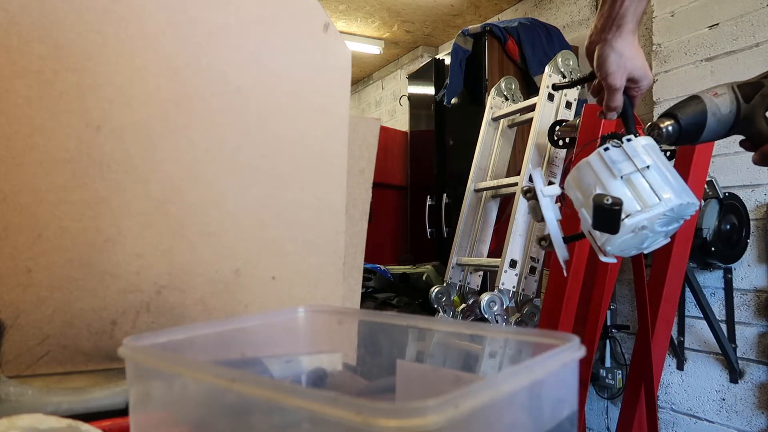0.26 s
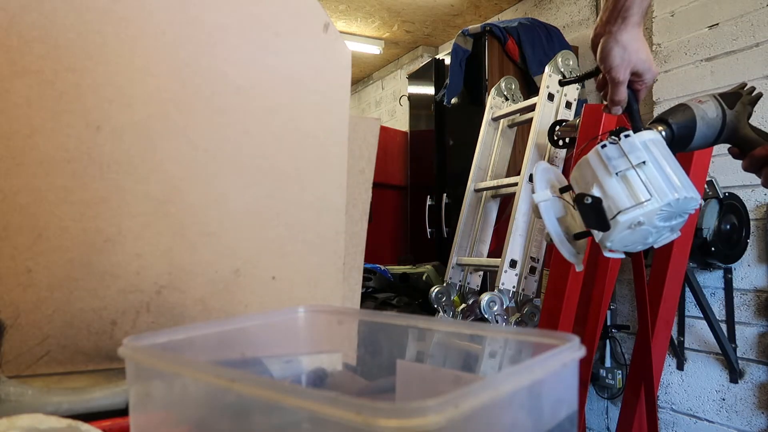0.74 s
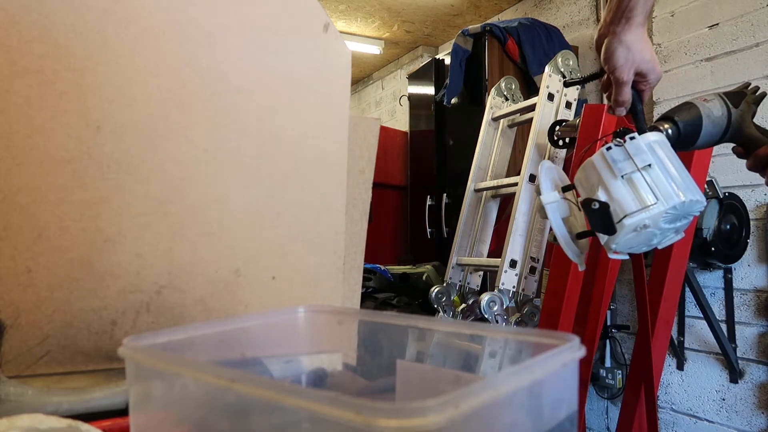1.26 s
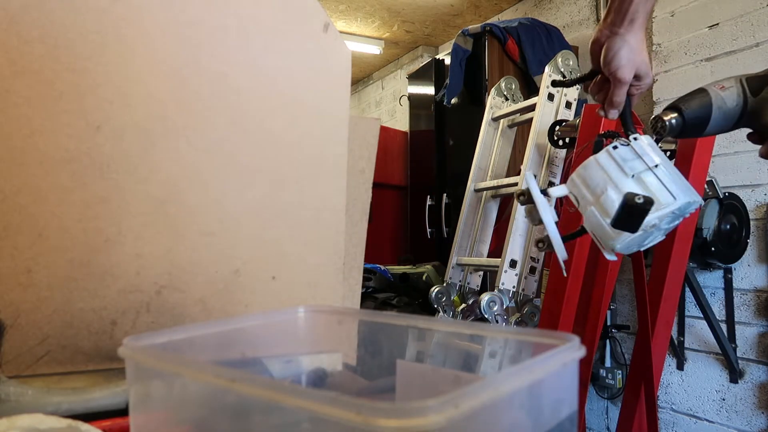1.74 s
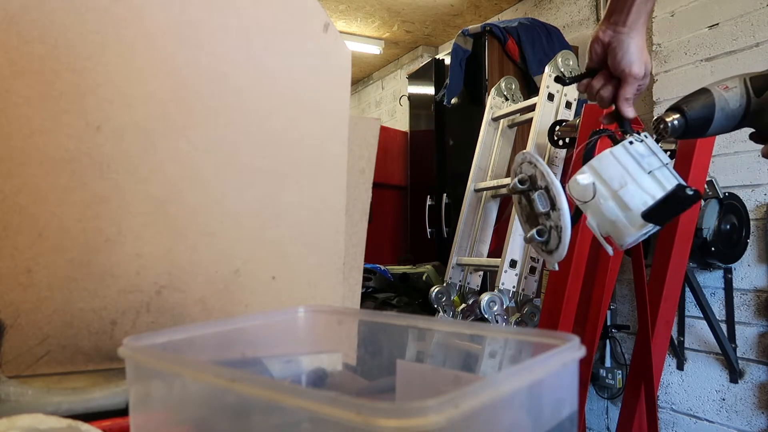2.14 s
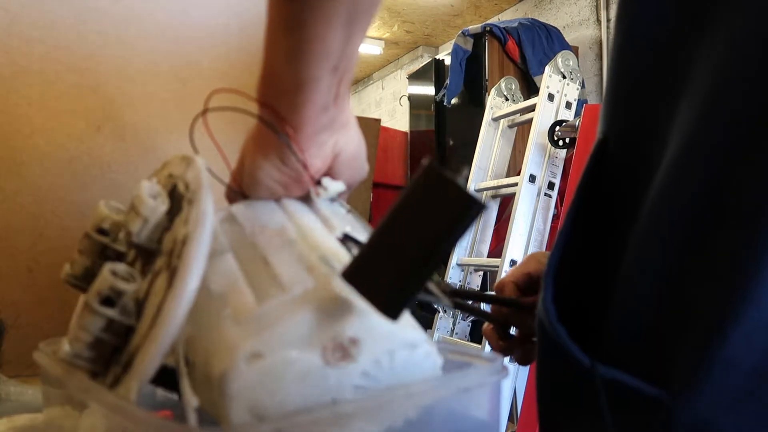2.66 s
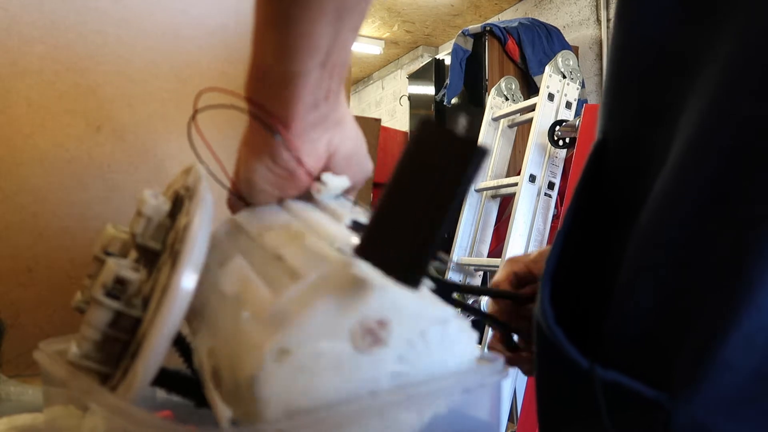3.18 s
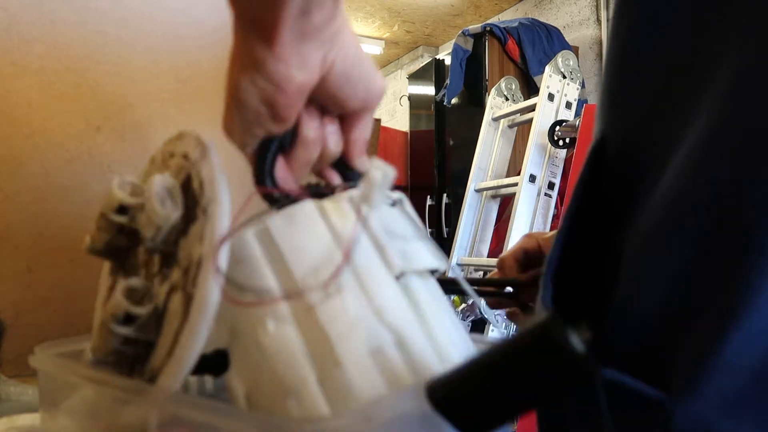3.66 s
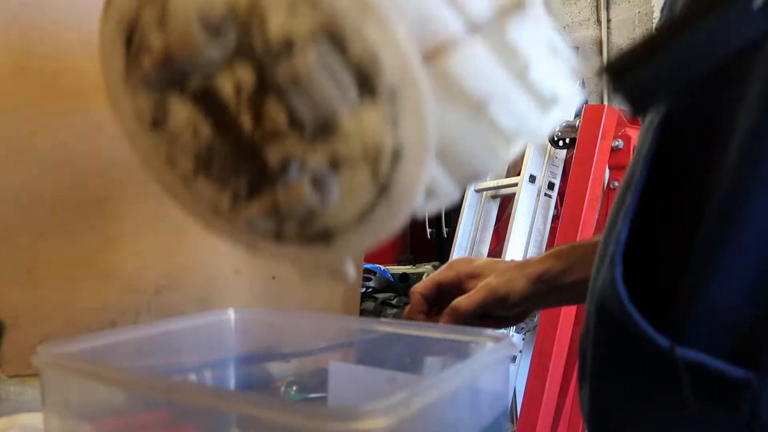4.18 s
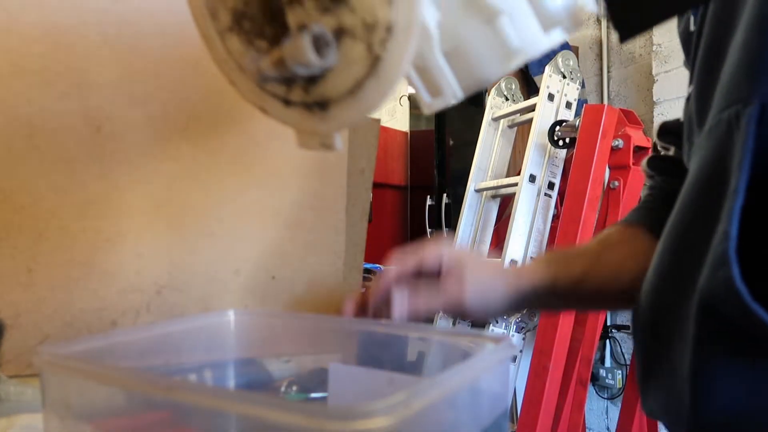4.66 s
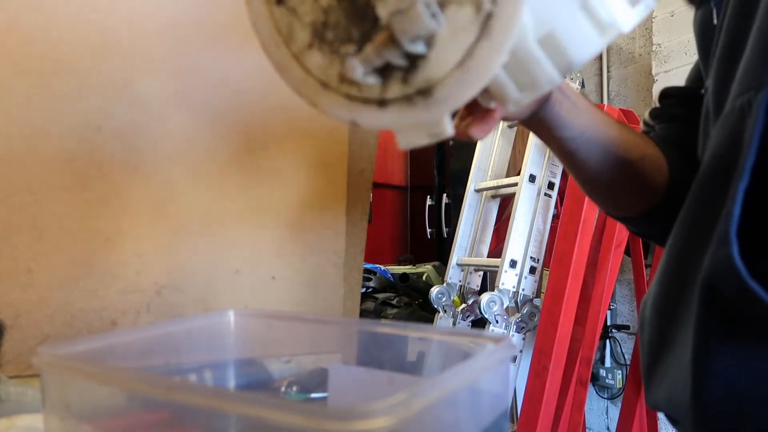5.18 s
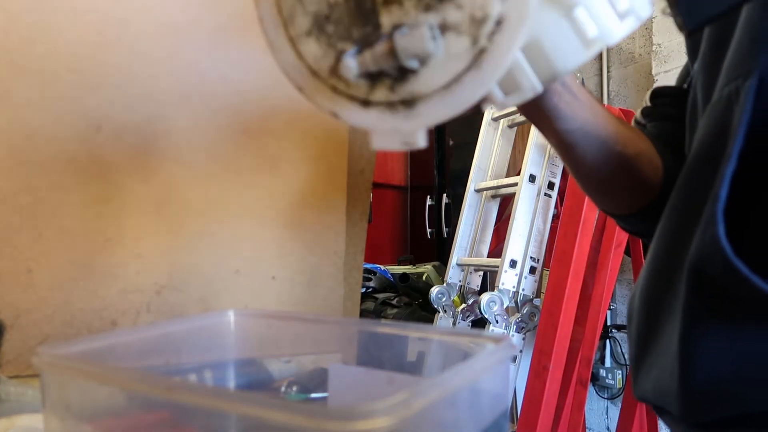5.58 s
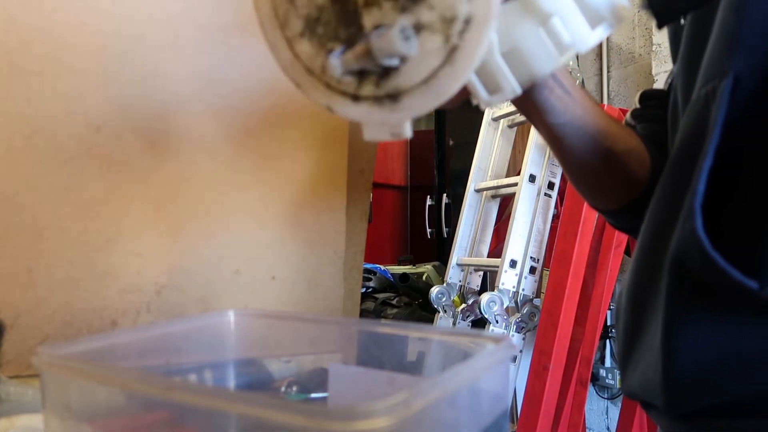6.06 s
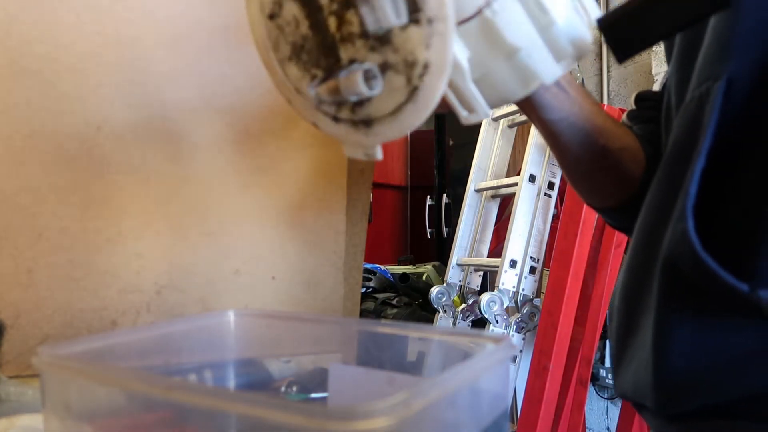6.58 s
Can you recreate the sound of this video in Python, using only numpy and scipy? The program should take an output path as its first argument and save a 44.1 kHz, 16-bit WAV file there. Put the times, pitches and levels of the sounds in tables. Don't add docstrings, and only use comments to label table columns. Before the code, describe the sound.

Steady hot-air blower roar and whine stop dead, followed by close plastic clatter, dull thumps and scrapes, then quiet handling clicks in a garage.

```python
import sys
import numpy as np
from scipy import signal
from scipy.fft import rfft, irfft, next_fast_len
from scipy.io import wavfile
from scipy.ndimage import uniform_filter1d

SR = 44100
rng = np.random.default_rng(int(sys.argv[2]) if len(sys.argv) > 2 else 0)


def store_wav(level_fs):
    pcm = np.round(np.clip(np.atleast_2d(level_fs), -1, 1) * 32767)
    wavfile.write(sys.argv[1], SR, pcm.T.astype(np.int16))


def makeup_ratio(level_db):
    decades = np.asarray(level_db, float) / 20
    return 10 ** decades


N = 301192
SIZE = 2 * next_fast_len(N // 2 + SR)
HZ = np.fft.rfftfreq(SIZE, 1 / SR)
TIME = np.arange(N) / SR
BLOW_TIME = np.arange(8192) / SR
CUT_S, LAST_CUT_S = 2.294, 6.62


def level(x, db=0):
    return x * makeup_ratio(db) / np.sqrt(np.mean(x ** 2))


def curves(table):
    s, *columns = np.transpose(table)
    return [np.interp(TIME, s, c) for c in columns]


def through(x, response):
    return irfft(rfft(x, SIZE) * response, SIZE)[:N]


def colour(points):
    hz, db = np.transpose(points)
    log_gain = np.log(makeup_ratio(np.interp(np.log(HZ + 1), np.log(hz), db)))
    cepstrum = irfft(log_gain, SIZE)
    cepstrum[1:SIZE // 2] *= 2
    cepstrum[SIZE // 2:] = 0
    return np.exp(rfft(cepstrum))


def resonance(hz, width):
    return 1 / (1 + 1j * (HZ ** 2 - hz ** 2) / ((HZ + 1) * width))


def walk(rate):
    k = int(SR / rate)
    smooth = uniform_filter1d(rng.standard_normal(N), k)
    return level(uniform_filter1d(smooth, k))


def tail(t60):
    t = TIME[:SR // 2]
    cloud = rng.standard_normal(len(t)) * 1000 ** (-t / max(t60, .002))
    return rfft(cloud / np.sqrt(np.sum(cloud ** 2)), SIZE)


def scatter(lags_s, gain):
    delays = np.exp(-2j * np.pi * np.outer(lags_s, HZ))
    return np.prod((delays - gain) / (1 - gain * delays), axis=0)


def add(out, s, x):
    i = int(s * SR)
    out[i:i + len(x)] += x[:N - i]


# (time [s], level [dB])
AIR_FLOW = [
    (0.0, -45),
    (0.5, -43.5),
    (0.9, -43),
    (2.29, -43.5),
]
# (frequency [Hz], level [dB per Hz])
JET_SPECTRUM = [(18, -64), (30, -16.5), (111, -10.5), (223, -2), (403, -14.5), (871, -8), (1160, -14),
                (1840, -2), (2040, -6), (2770, -8), (3150, -15.5), (5010, -22.5), (14000, -53)]
# (frequency [Hz], width [Hz], level over the jet [dB])
BARREL_MODES = [(273.5, 31, 8), (600, 200, 4), (873, 23, 7.5), (1077, 61, 12), (1259, 20, 11.5),
                (1698, 80, 8.5), (1884, 36, 9), (2290, 120, 2.5), (2670, 54, 4), (2865, 26, 11.5),
                (3580, 175, 11.5), (4850, 210, 8), (6300, 180, 5), (7030, 140, 9), (9100, 250, 7),
                (10600, 500, 12)]
# (multiple of shaft rate [1], level [dB])
SHAFT_WHINE = [(1, -69), (8, -54.5), (12, -62.5), (24, -77), (48, -103)]


def heat_gun():
    shaft_hz, gust_sway_db, roar_sway_db = 222.15, 0.5, 0.9
    air_db, = curves(AIR_FLOW)
    barrel = 1
    for hz, width, db in BARREL_MODES:
        barrel = barrel + (makeup_ratio(db) - 1) * np.abs(resonance(hz, width)) ** 2
    spectrum = barrel * colour(JET_SPECTRUM)

    jet = 0
    edges_hz = [20, 400, 800, 1600, 3200, 6400, 38400]
    for low_hz, high_hz in zip(edges_hz[:-1], edges_hz[1:]):
        band = (HZ >= low_hz) & (HZ < high_hz)
        gust_db = gust_sway_db * walk(2.8)
        roar_db = roar_sway_db * walk(1.8) * (low_hz == 20)
        jet = jet + makeup_ratio(gust_db + roar_db) * through(rng.standard_normal(N), band * spectrum)

    turns = np.cumsum(shaft_hz * (1 + 0.00031 * walk(1.43))) / SR
    whine = 0
    for k, db in SHAFT_WHINE:
        whine = whine + makeup_ratio(db + 3.7 * walk(17)) * np.sqrt(2) * np.sin(2 * np.pi * k * turns)

    walls = through(level(jet, 1.0) * makeup_ratio(air_db), 0.92 + 0.25 * tail(0.11))
    return (walls + whine) * np.clip((CUT_S - TIME) / 0.0007, 0, 1)


# (time [s], extra share of the whistling bands [1])
NOZZLE_AIM = [
    (0, 0),
    (.7, .05),
    (1, 0.3),
    (1.7, 0.096),
    (2.29, 0.3),
]


def flutter(jet):
    aim, = curves(NOZZLE_AIM)
    low = through(jet, resonance(1800, 350)) * (aim + 0.084 * walk(14))
    high = through(jet, resonance(2860, 440)) * (1.1 * aim + .15 * walk(18))
    return jet + low + high


def patchy_top(x):
    frame, band_hz = 1024, 689
    out = through(x, HZ < 7580)
    gun = np.arange(N // frame + 1) * frame < CUT_S * SR
    for low_hz in np.arange(7580, 15000, band_hz):
        steady = (low_hz < 11000) * (.25 if 9600 < low_hz < 10000 else .72)
        share = np.where(gun, steady, np.clip(1 - ((low_hz - 7000) / 8000) ** 2, 0, 1))
        kept = uniform_filter1d(rng.random(len(gun)), size=2) < .06 + .62 * share
        gain = kept * makeup_ratio(3.0 * (1 - share))
        gate = uniform_filter1d(np.repeat(gain, frame)[:N], size=256)
        out = out + gate * through(x, (HZ >= low_hz) & (HZ < low_hz + band_hz))
    return out


def ring(hz, db, t60, rise_s):
    t = BLOW_TIME[:, None]
    modes = makeup_ratio(db) * np.sin(2 * np.pi * hz * t) * 1000 ** (-t / np.maximum(t60, .003))
    x = modes.sum(axis=1) * (1 - np.exp(-BLOW_TIME / rise_s)) ** 2
    return x / np.abs(x).max()


def thump(body, peak_db, struck_hz, damping, rise_s):
    hz, db, t60 = np.transpose(body)
    detune, share = rng.standard_normal((2, len(body)))
    db = 1.13 * db - 9 * np.abs(np.log2(hz / struck_hz)) + 3.8 * share
    return makeup_ratio(peak_db) * ring(hz * (1 + 0.041 * detune), db, damping * t60, rise_s)


# (frequency [Hz], level [dB], t60 [s])
TUB_MODES = [(92, -8, 0.22), (160, 1, 0.047), (165, -1, 0.085), (226.8, -5, 0.15), (276.3, 4, 0.077),
             (356, -7, 0.13), (460, 0.5, 0.11), (600, -7, 0.2), (676.4, -11, 0.091)]
# (time [s], peak [dB], struck pitch [Hz])
TUB_BUMPS = [(2.294, -40, 587), (2.417, -42, 280), (2.504, -29.5, 276), (2.516, -39, 680),
             (2.664, -44.5, 600), (2.819, -29, 600), (2.849, -31.5, 260), (2.92, -35, 570),
             (3.042, -31.5, 240), (3.076, -28.5, 280), (3.14, -34.5, 454), (3.307, -26.5, 270),
             (3.35, -26.5, 133), (3.383, -30, 141), (3.399, -22, 150), (3.44, -25, 330),
             (3.597, -35.5, 164), (3.811, -18.5, 195), (3.868, -21.5, 138), (3.924, -22, 300),
             (3.98, -14, 440), (4.147, -39.5, 300), (4.276, -39.5, 159), (4.436, -29, 190),
             (4.514, -22, 300), (4.654, -20.5, 283), (4.688, -27, 290)]


def thuds():
    out = np.zeros(N)
    softest_db = min(np.transpose(TUB_BUMPS)[1])
    for s, peak_db, struck_hz in TUB_BUMPS:
        damping = max(0.82 - 0.013 * (peak_db - softest_db), .1)
        add(out, s, thump(TUB_MODES, peak_db - 7.0, struck_hz, damping, rise_s=0.0017))
    return out


# (frequency [Hz], level [dB per Hz])
STILL_AIR = [(12, -40), (20, 0.5), (98, 3.5), (213, -6), (706, -8), (789, -20), (1720, -14.5),
             (1980, -22.5), (2210, -16), (5860, -26.5), (15500, -44.5)]
# (time [s], deep rumble level [dB])
BENCH_RUMBLE = [(2.3, -53), (2.72, -61), (2.8, -51.5), (3.41, -49), (3.56, -57), (3.83, -45.5), (4.32, -69),
                (4.62, -54.5), (5.36, -80), (5.78, -89), (6.6, -69.5), (6.83, -60.5)]


def garage(handling):
    air_db, last_air_db = -65, 3
    duck_from_db, duck_share, recover_s = -47.5, 0.88, 0.44
    keep = np.exp(-1 / (recover_s * SR))
    loud = signal.lfilter([1 - keep], [1, -keep], handling ** 2)
    duck = (1 + loud / makeup_ratio(duck_from_db) ** 2) ** (-duck_share / 2)
    duck = duck * np.where(TIME > LAST_CUT_S, makeup_ratio(last_air_db), 1)
    air = level(through(rng.standard_normal(N), colour(STILL_AIR) * (HZ < 12900)), air_db)
    deep = level(through(rng.standard_normal(N), resonance(48, 90) ** 2))
    return duck * air + makeup_ratio(curves(BENCH_RUMBLE)[0]) * deep


def burst(hz, width, t60, contact):
    f = np.fft.rfftfreq(len(BLOW_TIME), 1 / SR) + 1
    fall = 1000 ** (-BLOW_TIME / max(t60, .003)) + contact * 1000 ** (-BLOW_TIME / 0.00092)
    band = 1 / (1 + 1j * (f ** 2 - hz ** 2) / (f * width)) ** 2
    x = irfft(rfft(rng.standard_normal(len(fall)) * fall) * band)
    return x / np.abs(x).max()


def blows(table, body, struck_hz, body_db, ring_s):
    out = np.zeros(N)
    for s, click_db, click_hz, thump_db, crack_db in table:
        clack = burst(900 + 0.64 * click_hz, 900 + 0.26 * click_hz, ring_s, contact=0.28)
        add(out, s, makeup_ratio(click_db - 5.0) * clack)
        modes_hz = click_hz * np.array([1, 1.75, 2.4])
        modes_db = np.array([0, -3, -5]) - 25 * np.log2(np.maximum(modes_hz / 3800, 1))
        add(out, s, makeup_ratio(click_db - 4.5) * ring(modes_hz, modes_db, 0.39 * ring_s, .0001))
        add(out, s, makeup_ratio(click_db + crack_db) * burst(3600, 9300, 1.86 * ring_s, contact=0.27))
        add(out, s, thump(body, thump_db + body_db, struck_hz, damping=0.48, rise_s=0.00081))
    return out


# (time [s], click peak [dB], click pitch [Hz], thump peak [dB], top crack
# over click [dB])
TUB_BLOWS = [(2.391, -48, 1160, -43, -0.5), (2.414, -35.5, 1037, -42.5, -8.5), (2.503, -33, 2290, -36, -14.5),
             (2.598, -27.5, 2057, -42, -47), (2.712, -43.5, 2200, -55, -36), (2.799, -31.5, 980, -35, -14.5),
             (2.818, -31, 1780, -29.5, -9), (2.914, -41, 2080, -36.5, -28), (3.056, -36, 1790, -54, -20.5),
             (3.165, -36, 2290, -29.5, -37), (3.209, -39, 2670, -40, -46), (3.258, -25, 1400, -30.5, -30),
             (3.306, -25, 1400, -23.5, -37), (3.374, -41.5, 1456, -28.5, -41), (3.585, -36, 2170, -36, -26.5),
             (3.597, -47, 2480, -43, 4), (3.654, -35.5, 1130, -39.5, -43),
             (3.702, -15, 1280, -49, -19), (3.717, -28, 950, -36, -28), (3.755, -20.5, 920, -34, -14),
              (3.780, -13.5, 1676, -25, -26), (3.794, -27, 2400, -23, -27), (3.832, -27, 1690, -34, -40),
              (3.867, -22, 1270, -48, -46), (3.926, -22.5, 1455, -23.5, -57), (3.943, -27, 2330, -55, -8.5),
              (3.981, -15.5, 960, -28, -42), (4.078, -31.5, 2280, -62, -12), (4.182, -46, 2570, -71.5, -24),
              (4.207, -42.5, 2070, -58, -9.5), (4.22, -40, 2530, -67, -26.5), (4.4, -42, 1504, -68, -12),
              (4.438, -40, 915, -55, -31), (4.514, -20, 880, -25, -20), (4.642, -27, 1080, -32, -46),
              (4.653, -26, 1960, -25, 3.5), (4.665, -25, 1580, -41, -6)]
# (time [s], click peak [dB], click pitch [Hz], thump peak [dB], top crack over click [dB])
TUB_RATTLES = [(2.521, -47, 1470, -45, -22), (2.625, -42, 2280, -60, -28), (2.661, -45, 1500, -50, -30),
               (2.848, -42, 1510, -47, -19), (2.888, -47, 2750, -51, -23), (2.926, -42, 1510, -46, -23),
               (3.266, -30.5, 1900, -38, -18), (3.331, -40, 2010, -45, -22), (3.353, -39, 1410, -43, -26),
               (3.394, -40, 1880, -44.5, -27), (3.411, -33, 2550, -44, -23), (3.428, -36, 2570, -44, -18),
               (3.444, -30, 1270, -46, -27), (3.458, -34, 1380, -45.5, -21), (3.474, -35, 1305, -43, -26),
               (3.733, -28.5, 1700, -37, -19.5), (3.768, -34, 2340, -37, -23),
               (3.787, -15.5, 2440, -35, -26), (3.805, -29, 2450, -33.5, -30),
               (3.82, -32.5, 1720, -44, -31), (3.841, -32, 2530, -48, -27), (3.895, -29, 1590, -36, -26),
               (3.907, -33, 2220, -45, -25), (3.916, -26.5, 2460, -44, -26.5), (3.953, -23, 2370, -47, -17),
               (3.969, -33, 2350, -43.5, -15), (3.989, -27, 1340, -36.5, -25), (4.107, -50, 2340, -60, -19),
               (4.127, -53, 2400, -63, -20), (4.148, -46, 1020, -48, -40), (4.246, -49, 2500, -72, -14),
               (4.264, -54, 3260, -70, -10), (4.281, -52.5, 1040, -51, -35)]


def tub_knocks():
    hard = blows(TUB_BLOWS, TUB_MODES, struck_hz=550, body_db=-6, ring_s=0.053)
    return hard + blows(TUB_RATTLES, TUB_MODES, struck_hz=500, body_db=-5, ring_s=0.039)


def grains(rate, spread_db):
    slips = rng.random(N) < rate / SR
    size_db = spread_db * np.minimum(rng.exponential(size=N), 2)
    return slips * rng.standard_normal(N) * makeup_ratio(size_db)


def clatter(rate, ring_s):
    slips = np.abs(grains(rate, spread_db=2.2))
    slips = signal.lfilter([1], [1, -np.exp(-1 / (ring_s * SR))], slips)
    return (level(slips) + 0.4) * rng.standard_normal(N)


# (level fall [dB/s]) for rumble, scrape and rustle
RELEASE_DB_S = np.array([[170], [270], [330]])


def strokes(table, rest_db):
    grip_db_s = 1200
    handled = (TIME > table[0][0]) & (TIME < sum(table[-1][:2]))
    gain = makeup_ratio(np.array(rest_db))[:, None] * handled
    for s, length_s, *layers_db in table:
        rise_db = grip_db_s * np.maximum(s - TIME, 0)
        fade_db = rise_db + RELEASE_DB_S * np.maximum(TIME - s - length_s, 0)
        gain = np.hypot(gain, makeup_ratio(np.array(layers_db)[:, None] - np.minimum(fade_db, 200)))
    return gain


# (frequency [Hz], level [dB per Hz])
RUSTLE_SPECTRUM = [(2500, -14), (3600, -6.5), (5500, -15), (8000, -26), (12000, -36.5), (16000, -63)]


def friction(table, body, wall, rest_db):
    touch = strokes(table, rest_db)
    touch = np.minimum(touch, np.roll(touch, SR // 110, axis=1))
    soft = colour([(800, -5.5), (1500, -22.0), (6000, -71.5)])
    hollow = soft * sum(makeup_ratio(db) * resonance(hz, 1.19 / t60) for hz, db, t60 in body)
    rumble = level(through(grains(1200, spread_db=-0.5), hollow), -3.23)
    patches_hz = 640 * 1.22 ** np.arange(10)
    patches = sum(through(clatter(140, ring_s=0.008), resonance(hz, 0.12 * hz)) for hz in patches_hz)
    shared = clatter(330, ring_s=0.015)
    scrape = level(through(level(patches) + level(shared, -20), colour(wall)), -0.97)
    rustle = level(through(shared, colour(RUSTLE_SPECTRUM)), -4.5)
    return (touch * [rumble, scrape, rustle]).sum(axis=0)


# (frequency [Hz], level [dB per Hz])
TUB_SCRAPE = [(350, -9.5), (600, -12.5), (892, -2), (1250, -3.5), (2010, -9), (2460, -7.5), (2750, -12.5),
              (4000, -23), (5200, -82.5), (8800, -120)]
# (start [s], length [s], body rumble [dB], scrape [dB], fine rustle [dB])
TUB_STROKES = [(2.4, 0.034, -47.5, -63, -63), (2.5, 0.0074, -47.5, -52, -57), (2.61, 0.11, -53.5, -63, -72),
               (2.8, 0.045, -49.5, -47.5, -59), (2.9, 0.18, -50, -62.5, -68.5), (3.05, 0.17, -48, -53, -67),
               (3.26, 0.15, -41.5, -49.5, -56.5), (3.38, 0.081, -33, -47, -59),
               (3.48, 0.1, -46, -59, -66.5), (3.6, 0.1, -37.5, -49.5, -70), (3.7, 0.008, -28.5, -35, -39),
               (3.74, 0.014, -33, -44, -48), (3.78, 0.17, -37, -45, -62), (3.99, 0.016, -44, -48.5, -61.5),
               (4.078, 0.011, -62, -58, -69.5), (4.2, 0.051, -69.5, -71, -69), (4.44, 0.018, -46, -62, -83),
               (4.515, 0.015, -36, -42.5, -60), (4.645, 0.0088, -35, -37, -38), (4.7, 0.02, -51, -72, -74)]


def dragging():
    return friction(TUB_STROKES, TUB_MODES, TUB_SCRAPE, rest_db=[-68, -80, -95])


# (time [s], peak [dB], frequency [Hz], t60 [s])
PANEL_RINGS = [(2.512, -41, 680, 0.13), (2.664, -46, 590, .2), (2.818, -39.5, 600, 0.086),
               (2.92, -46.5, 580, .12), (3.309, -33.5, 575, 0.093), (3.586, -42, 600, .1),
               (3.715, -32, 600, 0.065), (3.802, -28.5, 621, .08), (3.984, -21, 460, 0.11),
               (4.15, -50, 550, 0.061), (4.44, -44, 450, .08), (4.518, -30.5, 865, 0.088),
               (4.52, -30.5, 460, 0.077), (6.72, -48, 600, .07), (4.692, -39, 180, .3),
               (4.515, -27, 2700, .025), (4.515, -28, 1650, .04), (4.53, -42, 1550, .15),
               (4.52, -30, 390, .1), (4.515, -32, 3400, .02), (4.514, -27, 235, .025),
               (3.925, -20.5, 240, .025), (3.981, -25, 260, .022), (3.982, -22, 2200, .02),
               (3.703, -19, 2450, .022), (3.702, -21, 3600, .018), (3.713, -26, 915, .08),
               (3.783, -25, 2950, .04), (3.79, -27, 2520, .07), (3.915, -27, 2450, .03),
               (3.925, -26, 2450, .025), (3.259, -29, 2800, .025), (3.26, -33, 590, .14),
               (3.453, -27, 330, .04), (5.614, -49, 3720, .13), (3.306, -31, 1380, .05),
               (6.247, -51, 3900, .1), (2.801, -33, 240, .06), (4.0, -30, 165, .1), (3.905, -29, 230, .04),
               (2.599, -32, 2900, .016), (2.62, -46, 2200, .06), (4.655, -24, 400, .03)]


def panels():
    out = np.zeros(N)
    for s, peak_db, panel_hz, t60 in PANEL_RINGS:
        pair_hz = panel_hz * np.array([.96, 1.03])
        add(out, s, makeup_ratio(peak_db) * ring(pair_hz, 0, t60, 0.35 / panel_hz))
    return out


# (time [s], peak [dB], t60 [s])
EDGE_CHATTER = [
    (2.815, -59, .07),
    (3.598, -68, .05),
    (3.702, -55, .1),
    (3.74, -55, .12),
    (3.78, -57, .07),
    (3.943, -61, .08),
    (4.652, -52, .14),
]


def fizz():
    out = np.zeros(N)
    for s, peak_db, t60 in EDGE_CHATTER:
        add(out, s, makeup_ratio(peak_db) * burst(12500, 5000, t60, contact=0.2))
    return out


# (frequency [Hz], level [dB], t60 [s])
HOUSING_MODES = [(483, -6.5, 0.044), (654, -2, 0.12), (900, 6, 0.023)]
# (time [s], click peak [dB], click pitch [Hz], thump peak [dB], top crack over click [dB])
HAND_TICKS = [(4.888, -60, 2600, -82, -39), (4.941, -44, 2400, -51, -44), (5.105, -40, 915, -55, -11),
              (5.139, -43, 2460, -59, -22), (5.215, -51, 2360, -61, -34), (5.247, -43, 2590, -50.5, -28),
              (5.284, -38.5, 1420, -47, -17), (5.356, -43, 1490, -48.5, -24), (5.411, -48, 1420, -61, -37),
              (5.613, -40, 3860, -72, -12), (5.705, -41.5, 1590, -58, -29), (5.734, -63, 1750, -47, -47),
              (6.108, -40, 1480, -77, -21), (6.212, -38.5, 2540, -61, -47), (6.245, -40, 3840, -71, -29),
              (6.401, -48, 2280, -80, -21), (6.692, -41.5, 1455, -50, -23), (6.719, -45, 1610, -49, -34),
              (6.749, -43, 1570, -67, -19), (6.763, -40.5, 910, -47, -14)]
# (time [s], click peak [dB], click pitch [Hz], thump peak [dB], top crack over click [dB])
HAND_FIDGETS = [(5.053, -62, 2120, -75, -30), (5.064, -56, 2410, -71, -30), (5.119, -42, 1500, -49, -25),
                (5.149, -43, 3800, -63, -20), (5.31, -51, 1500, -53, -24), (5.431, -61, 2640, -68, -28),
                (5.541, -49, 2420, -70, -26), (5.553, -45, 1900, -73, -25), (5.572, -47, 2100, -70, -25),
                (5.607, -45, 1500, -73, -16), (5.623, -43, 2460, -67, -25), (5.637, -42, 1890, -70, -27),
                (5.667, -52, 2020, -70, -27), (5.679, -44, 2370, -65, -30), (5.723, -54, 2280, -53, -30),
                (5.749, -44, 1500, -53, -30), (5.79, -65, 1500, -54.5, -30), (5.808, -58, 3800, -56, -30),
                (5.832, -54, 2370, -62, -8), (6.705, -53, 2300, -55, -27), (6.735, -56, 2040, -61, -25)]


def housing_ticks():
    ticks = blows(HAND_TICKS, HOUSING_MODES, struck_hz=642, body_db=-0.5, ring_s=0.064)
    return ticks + blows(HAND_FIDGETS, HOUSING_MODES, struck_hz=647, body_db=-2.0, ring_s=0.04)


# (frequency [Hz], level [dB per Hz])
HOUSING_RUB = [(290, -60), (500, -27), (661, 0.5), (793, -12), (896, -15), (1120, -8.5), (1470, -1),
               (2460, -4.5), (4000, -17), (5200, -36), (8800, -120)]
# (start [s], length [s], body rumble [dB], scrape [dB], fine rustle [dB])
HAND_STROKES = [(4.935, 0.014, -62.5, -61, -65.5), (5.1, 0.036, -59.5, -53.5, -62.5),
                (5.21, 0.1, -65.5, -68, -82), (5.356, 0.0031, -63, -72, -74), (5.495, 0.16, -80, -65, -80),
                (5.6, 0.09, -76, -62, -71), (5.7, 0.056, -61.5, -59, -84), (5.83, 0.23, -68.5, -69.5, -78),
                (6.108, 0.042, -64, -60.5, -64.5), (6.21, 0.074, -67, -61, -67),
                (6.39, 0.017, -58.5, -75, -62.5), (6.67, .16, -66.5, -64, -82)]


def turning():
    return friction(HAND_STROKES, TUB_MODES + HOUSING_MODES, HOUSING_RUB, rest_db=[-72, -78, -96])


# (time [s], peak [dB], frequency [Hz])
DRY_SNAP = [
    (6.797, -37, 6240),
]


def snap():
    hiss = level(np.diff(rng.standard_normal(N + 1)), -82)
    out = hiss * (TIME > LAST_CUT_S)
    for s, peak_db, snap_hz in DRY_SNAP:
        add(out, s, makeup_ratio(peak_db) * ring(snap_hz * np.array([1, 1.3, 1.6]), 0, 0.0034, 0.0001))
    return out


# (frequency [Hz], level [dB])
MID_RESPONSE = [(30, -31), (110, 5.5), (6000, -5.5), (12500, -18), (14500, -25.5)]


def room():
    duller = colour([(100, 0.0), (1500, 1.5), (8000, -8.5)])
    early = makeup_ratio(-5) * tail(0.08) * duller
    boom = makeup_ratio(-5) * tail(0.44) * colour([(260, -0.5), (600, -26.5)])
    return colour(MID_RESPONSE) * (1 + early + boom)


# (frequency [Hz], side minus mid [dB])
FAR_SIDE = [(60, -37.5), (110, -21), (200, -46), (380, -5.5), (700, -18.5), (1290, -18.5), (2380, -11.5),
            (4400, -2.5), (8120, 4.5), (13000, 19), (15000, 4)]
# (frequency [Hz], side minus mid [dB])
NEAR_SIDE = [(60, -39), (110, -67), (200, -36.5), (380, -19), (700, -16.5), (1290, -16.5), (2380, -14),
             (4400, -4.5), (8120, 3.5), (15000, 13)]


def scene():
    far = flutter(heat_gun())
    hits = thuds() + tub_knocks() + panels() + housing_ticks()
    rubbing = dragging() + turning()
    handling = (through(hits, room()) + rubbing) * (TIME > CUT_S)
    near = handling + garage(handling) * (TIME > CUT_S)
    last = snap()

    path = scatter([.00031, .00067, .0017, .0029], gain=.55) * colour([(12500, 0), (13500, -16)])
    far_path = path * scatter([.0071, .013], gain=.6) * colour(FAR_SIDE)
    side = through(far, far_path) * (TIME < CUT_S)
    side = side - 0.036 * far
    side = side + through(near, path * colour(NEAR_SIDE)) * np.where(TIME > LAST_CUT_S, makeup_ratio(-8), 1)
    side = side + makeup_ratio(-5) * through(last, path / np.abs(path))

    knocks_end_s = 4.03
    busy = uniform_filter1d(((TIME > 3.31) & (TIME < knocks_end_s)) * 1., size=512)
    near = near + fizz()
    near = np.where(TIME < knocks_end_s, near, through(near, HZ < 13300))
    mid = patchy_top(far + busy * near) + (1 - busy) * near + last
    return np.array([mid + side, mid - side])


def roll_off(x):
    return signal.sosfilt(signal.butter(12, 15670, fs=SR, output="sos"), x)


def record(dry):
    return roll_off(dry)


dry = scene()
out = record(dry)
store_wav(out)
```